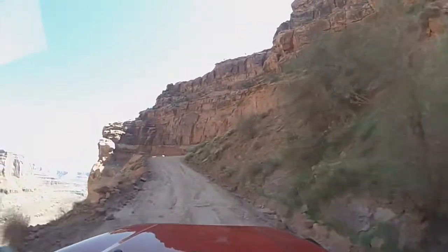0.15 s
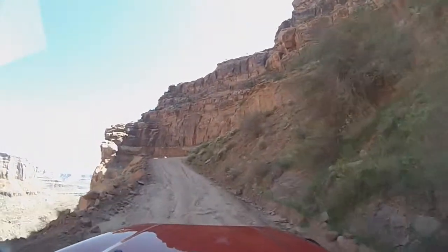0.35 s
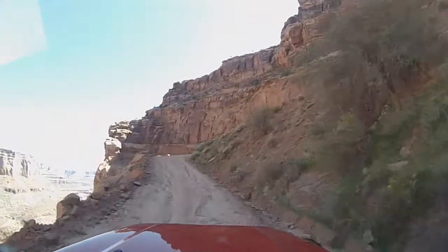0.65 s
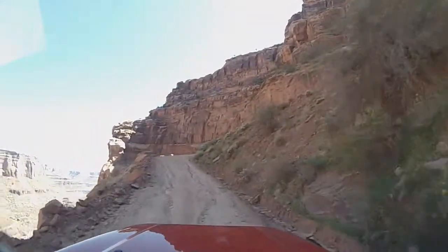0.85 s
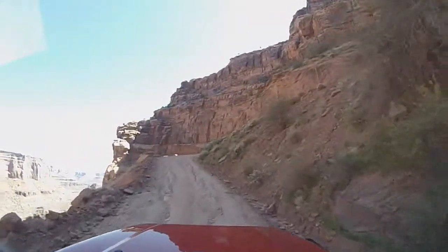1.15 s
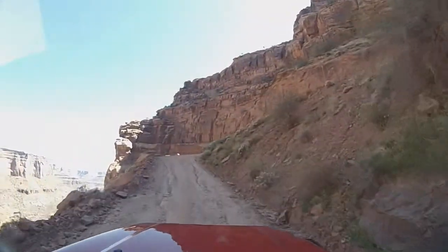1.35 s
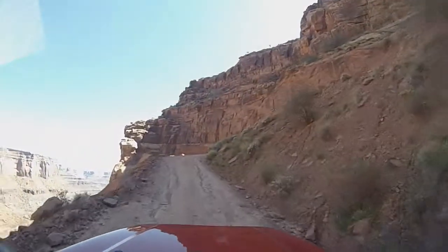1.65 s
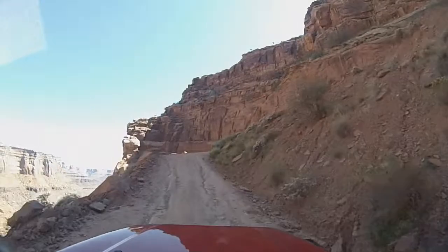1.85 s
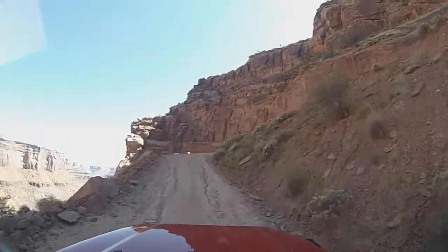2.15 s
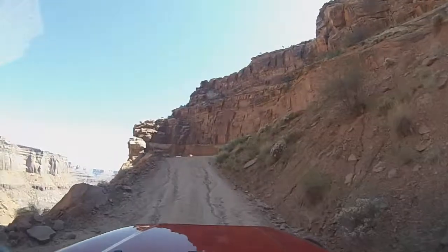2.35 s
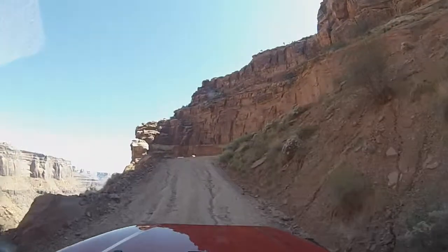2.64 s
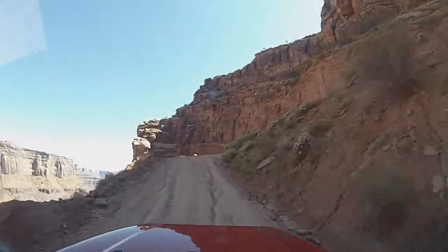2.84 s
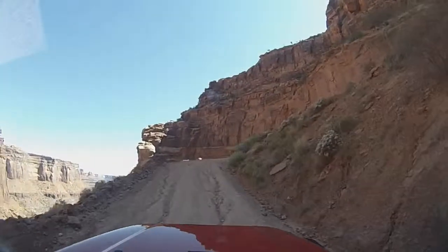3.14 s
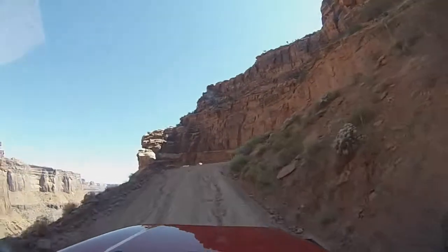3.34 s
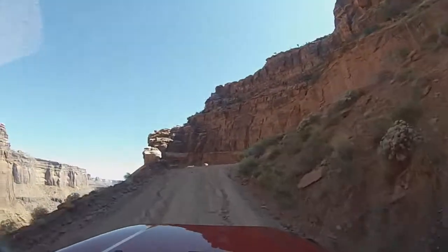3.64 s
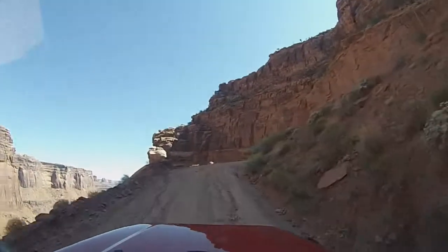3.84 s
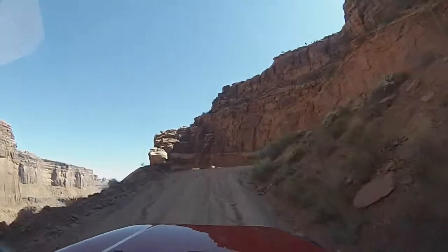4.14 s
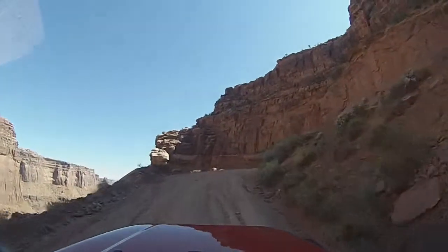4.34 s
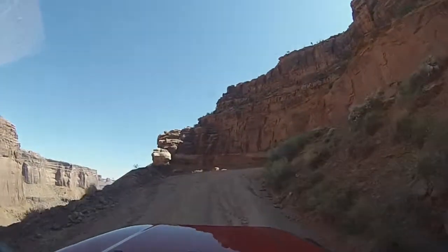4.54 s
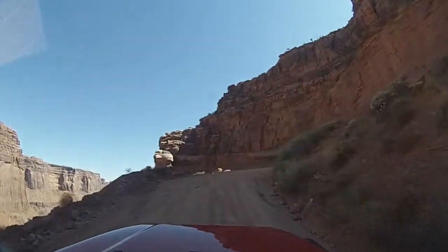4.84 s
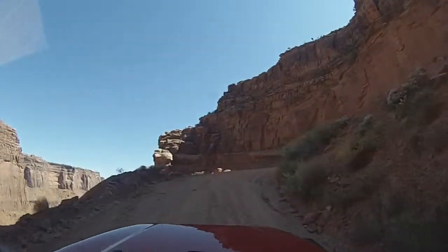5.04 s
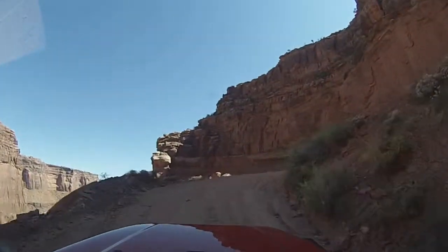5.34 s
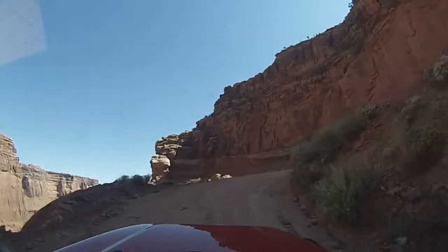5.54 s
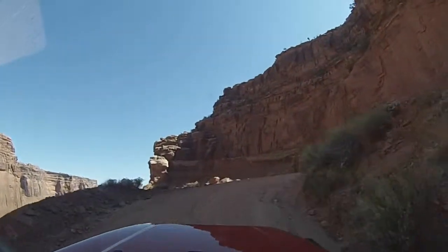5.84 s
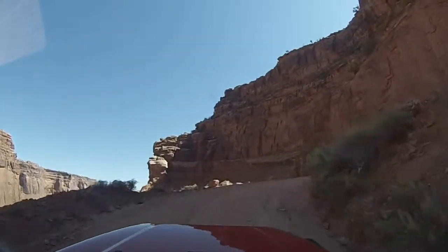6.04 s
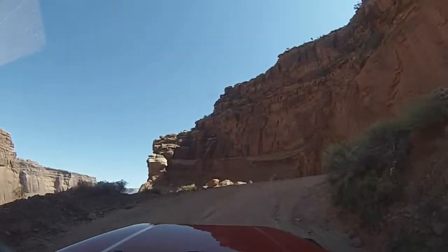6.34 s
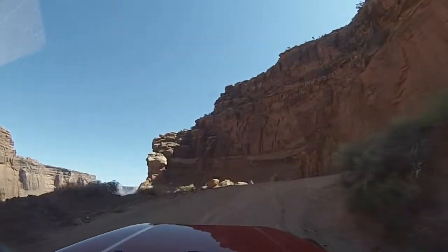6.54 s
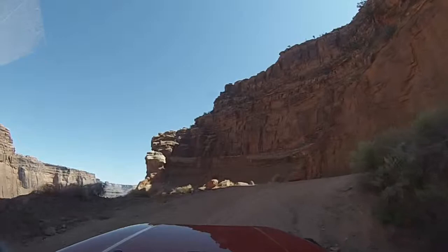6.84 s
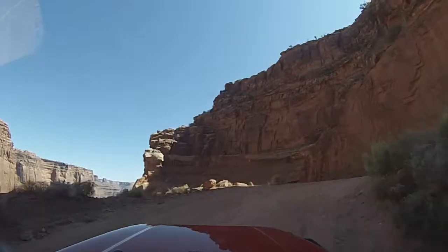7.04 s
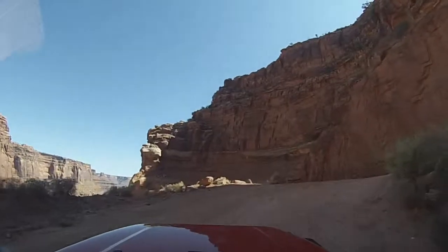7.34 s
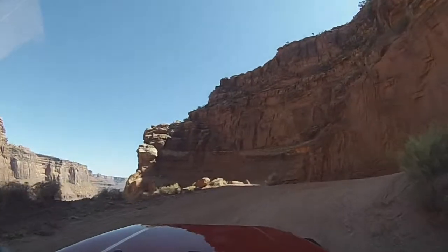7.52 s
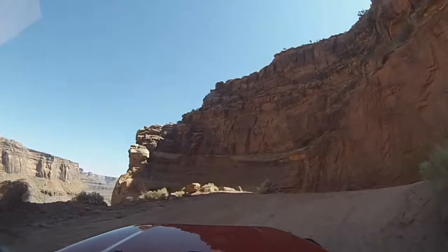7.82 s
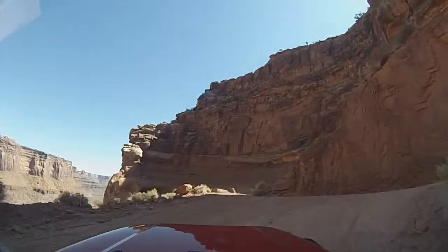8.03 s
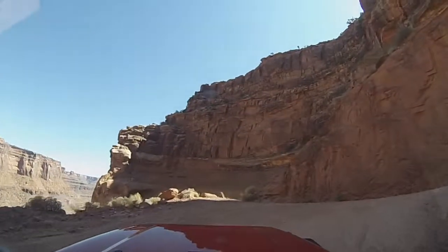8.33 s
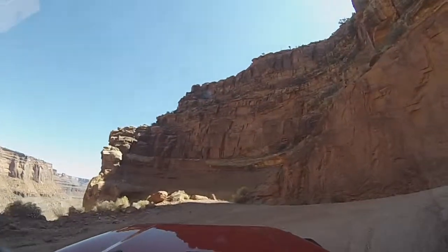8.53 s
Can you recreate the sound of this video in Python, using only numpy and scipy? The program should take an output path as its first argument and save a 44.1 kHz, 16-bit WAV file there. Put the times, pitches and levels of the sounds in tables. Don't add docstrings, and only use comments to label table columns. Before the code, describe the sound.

Inside a closed car cabin, deep shuddering boom and crunching gravel as a vehicle climbs a rough dirt track, rocks knocking underneath.

```python
import sys
import numpy as np
from scipy import signal
from scipy.fft import rfft, irfft, next_fast_len
from scipy.io import wavfile
from scipy.ndimage import uniform_filter1d

SR = 44100
rng = np.random.default_rng(int(sys.argv[2]) if len(sys.argv) > 2 else 0)


def wrap_up_sound(samples):
    columns = np.atleast_2d(samples).T
    tamed = np.clip(columns, -1, 1)
    steps = np.round(tamed * 32767).astype(np.int16)
    wavfile.write(sys.argv[1], SR, steps)


def ratio_of_db(decibels):
    return 10 ** (np.asarray(decibels, float) / 20)


N = 382788
TIME = np.arange(N) / SR
SIZE = next_fast_len(N + SR)
HZ = np.arange(SIZE // 2 + 1) * SR / SIZE + 1e-3

# start_s, firing_hz, level_db
ENGINE_SPEED = [(0, 74, -18), (.4, 79.5, -48), (.7, 88.1, -31.5), (1.7, 89.1, -30), (2.4, 92.8, -25),
                (2.8, 90.35, -27.5), (3.15, 94, -27.5), (4, 92.4, -25.5), (4.9, 94.3, -32),
                (5.4, 85.9, -32), (6.1, 75.9, -30), (6.9, 65.04, -30), (7.1, 68.8, -23),
                (7.45, 75.3, -20.5), (7.72, 82.8, -42), (8, 74, -22), (8.2, 67.62, -27),
                (8.68, 67.9, -20.5)]
# multiple_of_firing_rate, level_db
ENGINE_ORDERS = [
    (.5, -1),
    (1, 1),
    (2, -14),
    (3, -29),
]
# pitch_hz, half_width_hz, level_db
FAN_WHISTLES = [
    (2310, 37, -55.5),
    (2370, 25, -55.5),
]
# start_s, length_s, start_hz, end_hz, level_db
TRIM_SQUEAKS = [(.998, .038, 5780, 5780, -49.5), (1.005, .025, 5400, 5350, -52),
                (1.135, .04, 5700, 5300, -53), (1.175, .025, 5650, 5700, -53),
                (3.384, .024, 5700, 5750, -51), (3.388, .016, 5450, 5300, -53),
                (4.445, .02, 15000, 15000, -60), (5.085, .03, 15100, 15100, -60),
                (6.25, .032, 1180, 1100, -34), (6.28, .025, 1130, 1150, -37), (5.08, .06, 690, 700, -34),
                (7.5, .4, 245, 236, -31), (4.455, .015, 15200, 15200, -64), (2.299, .014, 3200, 3180, -38),
                (2.3, .01, 3800, 3700, -43), (8.222, .025, 1500, 1480, -33), (4.551, .01, 6300, 6000, -48),
                (4.551, .012, 4700, 4500, -44), (4.688, .016, 14500, 14400, -63)]
# start_s, level_db, tilt_db_per_octave above 5 kHz
PEBBLE_HITS = [
    (7.004, -41, 0),
    (7.018, -51, -3),
    (7.054, -53, -5),
]
# pitch_hz, level_db, t60_s
SHIELD_MODES = [(4050, 2, .03), (4380, 5, 0.04), (4750, 4, .04), (5150, 4, .03), (5300, 0, .08),
                (5480, 2, .03), (6300, -4, .025), (9300, -8, .025), (7680, -4, 0.06), (8260, -7, .03),
                (10400, -22, .6), (10800, -10, .08), (10950, -5, .025), (11500, -11, .03),
                (14900, -15, .12), (14600, -8, .025)]
# start_s, peak_db, low_part_db, middle_part_db
STONE_TICKS = [(0.12, -51.5, 12, -1), (0.3727, -48.5, 11, -2), (0.4813, -43, 3, -17), (0.616, -47, 4, -3),
               (0.746, -51, 16, -3), (0.7886, -53, 3, 0), (1.5933, -48.5, -6, 2.5), (1.7649, -58.5, 7, -1),
               (2.2423, -54, 1, -10), (2.3015, -45.5, 16, 3), (2.9537, -44.5, 13, -9),
               (3.032, -46.5, 13, -8), (3.3618, -51, 9, -1), (4.0881, -54, 4, -1), (4.1235, -49, 3, -1),
               (4.4498, -45, 3, -8), (4.5027, -46, 6.5, -1.5), (4.552, -63, 28, -4), (4.5744, -54, 0, 3),
               (4.6922, -48, -1, -2.5), (4.8239, -55, 6, -11), (4.8978, -47, 3, -5), (4.971, -47, 6, -6),
               (5.15, -47, 12, -4), (5.5804, -53, 15, -4), (6.1729, -46.5, 3, -2.5), (6.3689, -58, 5, -3),
               (7.4735, -47.5, 8, 1.5), (8.1389, -45.5, -1, -3), (8.2194, -62, 11, 3), (.8679, -57, 8, -3),
               (1.6367, -54, 5, -7), (1.8028, -57, 7, -1), (2.0253, -54, 6, -5), (2.384, -55, 6, -5),
               (2.7821, -57, 6, -4), (2.8554, -56, 7, -3), (2.8764, -53, 3, -5), (3.0974, -57, 9, -5),
               (4.1639, -54, 6, -6), (4.2313, -55, 7, -6), (6.0347, -58, 5, -3), (6.5994, -62, 10, -5),
               (6.8723, -56, 2, -11), (7.5118, -55, 2, -9), (.255, -57, 8, -2), (.912, -58, 12, 0),
               (4.463, -58, 4, -6), (4.681, -57, 2, -3), (5.74, -53, 8, -2)]
# start_s, peak_db, ring_hz, edge_db over the peak, t60_s
ROCK_KNOCKS = [(0.257, -23, 538, -16, 0.089), (0.636, -18, 448, -4, 0.1), (0.842, -16.5, 461, -15, 0.073),
               (1.569, -19, 472, 0, 0.086), (2.354, -21, 756, -16, 0.092), (2.973, -16, 422, -4.5, 0.15),
               (3.037, -19, 411, -5, 0.11), (3.489, -14, 430, -21, 0.085), (3.819, -23, 433, 1, 0.1),
               (4.553, -18, 400, -5, 0.16), (5.099, -18, 489, -18, 0.069), (5.744, -16, 506, -18, 0.13),
               (5.799, -26, 426, -21, 0.1), (6.25, -22, 500, -10, 0.13), (6.321, -18, 544, -19, 0.092),
               (8.086, -20.5, 439.5, -23, 0.091), (8.15, -23, 1050, -10, 0.16), (.136, -22, 439, -15, .08),
               (.756, -20, 377, -8, .12), (.886, -22, 398, -15, .1), (.925, -21, 549, -15, .1),
               (1.286, -22, 427, -15, .08), (1.318, -19, 416, -15, .09), (1.378, -22, 366, -15, .07),
               (1.895, -22, 371, -15, 0.089), (2.204, -20, 396, -15, .1), (2.41, -19, 380, -15, .1),
               (2.501, -21, 462, -15, .1), (2.66, -19, 448.4, -15, .08), (2.88, -21, 361, -15, .1),
               (3.101, -21, 374, -18, .12), (3.434, -23, 468, -15, .1), (4.234, -22, 376.5, -15, .1),
               (4.788, -25, 438, -15, 0.078), (5.228, -21, 326, -15, .12), (6.016, -24, 425, -15, .1),
               (7.664, -21, 450, -15, .07), (7.724, -26, 382, -15, .1), (4.595, -23, 1200, -6, 0.12)]
# start_s, peak_db, ring_hz, edge_db over the peak, t60_s
HARD_BLOWS = [
    (.546, -20, 520, -14, .05),
    (4.146, -15.5, 790, -15, .06),
    (5.717, -14, 700, -10, .08),
    (7.136, -17, 600, -6, .07),
    (8.226, -16.5, 820, -11, .16),
    (8.609, -25, 870, -8, .05),
    (7.641, -19.5, 450, -14, .08),
]
# start_s, length_s, low_hz, high_hz, level_db
GRIT_SCRAPE = (8.2, .055, 5200, 6700, -57)
# start_s, roughness_db, loose_gravel_db
TRACK_SURFACE = [(0, -2, -3), (.3, 1, -2), (.94, 3.5, .5), (1.45, 0, -2.5), (2.1, 1.5, 1.5),
                 (2.6, -0.5, .5), (3., 1, -0.5), (3.35, -2, -0.5), (3.57, 0.5, 2.5), (3.93, -1.5, 0),
                 (4.7, 0, -1), (5.3, 1.5, 0.5), (5.67, -1, -1), (6.1, 0.5, -2.5), (6.7, -7.5, -4),
                 (7.15, -7.5, -3.5), (7.55, -3, -2.5), (8.66, -7, -5.5)]
# centre_s, boom_change_db, length_s
CABIN_BUMPS = [(.14, 5.5, 0.066), (.23, 4, 0.044), (.36, 2.5, 0.044), (1.09, 3, 0.042), (1.21, 4.5, 0.055),
               (1.57, 2.5, 0.064), (1.87, 5, .1), (2.45, 3, 0.16), (2.74, 7, 0.091), (2.9, 5.5, 0.047),
               (3.07, 8.5, 0.041), (3.15, 7, 0.038), (3.5, 7.5, 0.044), (3.65, 3, 0.12), (3.94, 4, 0.049),
               (4.06, 10, 0.051), (4.2, 8, .05), (4.28, 5, 0.042), (4.68, 5, 0.12), (4.91, 4.5, 0.041),
               (5.27, 4.5, 0.043), (5.44, 2, 0.089), (5.68, 9, 0.057), (5.86, 5, .1), (6.12, 4.5, 0.046),
               (6.47, 7, 0.099), (6.62, 4.5, .07), (.95, 2.5, .06), (5.4, 0.5, .04), (8.66, 6, .04),
               (7.46, 6, 0.096), (7.68, 3.5, 0.081), (8.24, 9.5, 0.068), (8.5, 6.5, .1)]
# centre_s, boom_change_db, length_s
SPRING_FLOATS = [(0, -7, 0.08), (.19, -16, 0.035), (1.14, -8, 0.033), (1.45, -7, 0.08), (1.93, -19, 0.038),
                 (2.56, -8, 0.081), (2.85, -2, .03), (2.97, -9, 0.05), (3.43, -5.5, 0.11),
                 (3.75, -4.5, .03), (3.88, -15, 0.045), (4.01, -2.5, 0.046), (4.13, -7, .04),
                 (4.95, -23, .025), (5.11, -10, 0.051), (5.58, -6, 0.075), (5.76, -6.5, 0.09),
                 (6.07, -12.5, 0.052), (6.28, -2, .04), (6.74, -25, .04), (7.16, -9, 0.041),
                 (7.76, -7, 0.051), (8.12, -1, .06), (8.3, -5, 0.059), (8.56, -13, 0.051)]
# centre_s, drone_change_db,
# crunch_change_db, length_s
WHEEL_JOLTS = [(.25, 4.5, 1, 0.12), (.97, -2, 2.5, .03), (1.11, -4, -0.5, 0.039), (2.12, 3.5, -1.5, .04),
               (2.27, 1.5, 2.5, 0.099), (2.59, -7, -0.5, 0.057), (2.73, 2, 0, 0.055), (2.85, 2, -0.3, .05),
               (2.92, -3, 4, .03), (2.97, 7.5, 4.5, 0.051), (3.06, 7.5, -0.5, 0.063), (3.42, 6, 3, 0.088),
               (3.53, -6, 1.5, 0.053), (3.77, -3.5, -1.2, 0.11), (3.94, 2, 2.5, 0.035),
               (4.2, 2.5, 6, 0.064), (4.45, -3, 2.5, 0.053), (5.18, 5, -0.5, 0.098), (5.41, 4, 1, 0.043),
               (5.51, -1, -2, 0.051), (5.67, 6, 1.5, 0.047), (5.76, 2, 5, 0.13), (5.87, 6.5, -1, 0.041),
               (6.36, -7, 0, .04), (6.42, 0, 0.5, 0.044), (6.69, 7, -1, .04), (6.78, 5, 0.5, .05),
               (7.23, 1.5, -1.3, 0.13), (7.47, 7, 1, .1), (8.1, 8, 0, 0.044), (.413, 1, -6, 0.017),
               (.62, .1, -2.5, .06), (1.3, -0.5, -1, .08), (1.52, 1, 1.5, .06), (1.72, -6, -1, .05),
               (2.0, 3, 1.5, .05), (4.05, 4, 1.5, 0.055), (4.7, -3, 0.8, .1), (4.95, 2.5, 0, .06),
               (6.2, 2, 1.5, .06), (6.52, -3, -1, .08), (7.0, 0.5, -0.8, .08), (7.35, -2, -1, 0.067),
               (7.43, -0.5, 3, .03), (7.56, 1, 1, .06), (7.785, .1, -3, .02), (7.9, 1.5, -0.8, .08),
               (8.17, -4, 1, .05), (8.42, 4, -0.3, .08), (8.6, -2, 1.5, .06)]
# centre_s, level_change_db, length_s
LOW_HUM_SWELLS = [(.1, 0, 0.09), (.55, 1, .1), (1.0, -3, .08), (1.22, -4, 0.063), (1.37, 6.5, .1),
                  (1.7, 1.5, .1), (2.0, 2, .06), (2.15, 4, .06), (2.47, -5, 0.092), (2.85, 4, .1),
                  (3.1, -1, .1), (3.6, 0, .12), (3.93, -3, .06), (4.17, 7.5, .12), (4.5, -1.5, 0.098),
                  (4.85, 1.5, .08), (5.1, -3, .1), (5.3, -6, .08), (5.7, 0, .08), (5.95, -2.5, 0.082),
                  (6.3, -2, .1), (6.62, 4, 0.083), (6.78, -4, 0.059), (7.0, -4, .08), (7.4, 1.5, .1),
                  (7.8, -2, .1), (8.1, 4, .1), (8.4, 1.5, .1)]
# pitch_hz, level_db_per_hz
LOW_COLOUR = [(7.1, -33.5), (12, -3), (32, 0), (48, -1), (107, -14), (134, -15.5), (202, -20), (238, -19.5),
              (299, -23), (423, -23), (599, -32), (766, -29.5), (1600, -42.5), (2080, -72.5), (3520, -120)]
# pitch_hz, level_db_per_hz
TREBLE_COLOUR = [(710, -32), (1200, 2.5), (1630, -4), (2350, -7.5), (2500, -10), (3710, -13), (4080, -17),
                 (11100, -33.5), (14500, -40), (15300, -52)]
# pitch_hz, width_hz, gain_db
CABIN_RESONANCES = [(33.9, 4.3, 3), (43.8, 9.8, 4), (67.2, 11.4, 3.5), (129, 25.6, 7), (173.3, 32, 3),
                    (240.2, 16.6, 7), (414, 180, 0), (514, 50, 1.5), (790, 150, -0.5), (1130, 56, 4),
                    (2666, 150, 2.5), (3530, 300, -1), (14700, 1200, 6)]


def curves(table):
    s, *columns = np.transpose(table)
    return [np.interp(TIME, s, column) for column in columns]


def swells(rows):
    out = np.zeros((len(rows[0]) - 2, N))
    for s, *change_db, length in rows:
        near = slice(max(int((s - .5) * SR), 0), int((s + .5) * SR))
        width = np.clip(length / 2 ** .5, .008, .2)
        out[:, near] += np.outer(change_db, np.exp(-((TIME[near] - s) / width) ** 2))
    return out


def unit(x):
    return x / np.sqrt(np.mean(x ** 2))


def causal(x, gain):
    cepstrum = irfft(np.log(gain + 1e-9), SIZE)
    cepstrum[1:SIZE // 2] *= 2
    cepstrum[SIZE // 2 + 1:] = 0
    return irfft(rfft(x, SIZE) * np.exp(rfft(cepstrum)), SIZE)[:N]


def band(lo_hz, hi_hz, order=4):
    return ((1 + (lo_hz / HZ) ** (2 * order)) * (1 + (HZ / hi_hz) ** (2 * order))) ** -.5


def cabin(spectrum):
    hz, db = np.transpose(spectrum)
    peaks_db = sum(gain_db / (1 + (2 * (HZ - f) / width) ** 2) for f, width, gain_db in CABIN_RESONANCES)
    return ratio_of_db(np.interp(np.log(HZ), np.log(hz), db) + peaks_db)


def walk(rate_hz):
    hold = int(SR / rate_hz)
    steps = np.repeat(rng.standard_normal(N // hold + 1), hold)
    return unit(uniform_filter1d(uniform_filter1d(steps, hold), hold)[:N])


def grains(rate_hz, spread_db):
    chance = rng.random((3, N))
    cracks = chance[0] < rate_hz / SR
    sign = np.sign(chance[1] - .5)
    return unit(cracks * sign * ratio_of_db(-spread_db * np.log(1 - chance[2])))


def burst(s, t60, wave, rise=0.0003):
    i = int(s * SR)
    t = np.arange(min(len(wave), N - i)) / SR
    return slice(i, i + len(t)), wave[:len(t)] * np.minimum(t / rise, 1) * ratio_of_db(-60 * t / max(t60, .005))


def damped(x, share, span_s):
    swing = uniform_filter1d(np.abs(signal.hilbert(x, SIZE)[:N]), int(span_s * SR))
    return unit(x / swing ** share)


def fan():
    air = rng.standard_normal(N)
    return sum(ratio_of_db(db) * unit(causal(air, band(hz - width, hz + width, order=40)))
               for hz, width, db in FAN_WHISTLES)


def engine():
    hz, db = curves(ENGINE_SPEED)
    phase = 2 * np.pi * np.cumsum(hz * (1 + 0.00375 * walk(12))) / SR
    orders = sum(ratio_of_db(order_db + 1.3 * walk(9)) * np.sin(k * phase + k * k) for k, order_db in ENGINE_ORDERS)
    return np.sqrt(2) * ratio_of_db(db) * orders


def squeaks():
    out = np.zeros(N)
    unsteady, stutter = 1 + .009 * walk(500), ratio_of_db(2.5 * walk(300))
    for s, length, start_hz, end_hz, db in TRIM_SQUEAKS:
        along = np.clip((TIME - s) / length, 0, 1)
        hz = (start_hz + (end_hz - start_hz) * along) * unsteady
        swing = np.sin(2 * np.pi * np.cumsum(hz) / SR)
        out += ratio_of_db(db) * np.sin(np.pi * along) * stutter * swing
    return out


def pebble():
    out, t = np.zeros(N), np.arange(SR // 2) / SR
    for s, db, tilt_db in PEBBLE_HITS:
        for hz, mode_db, t60 in SHIELD_MODES:
            where, wave = burst(s, t60, np.sin(2 * np.pi * hz * t))
            out[where] += ratio_of_db(db + mode_db + tilt_db * max(np.log2(hz / 5000), 0)) * wave
        where, click = burst(s, 0.03, rng.standard_normal(4000))
        out[where] += ratio_of_db(db + 3 + tilt_db) * click
    chatter = ratio_of_db(2.5 * walk(300))
    return causal(out * chatter, band(3600, 11200, order=5) + .16 * band(11200, 15600, order=8))


def ticks():
    parts, chance = np.zeros((3, N)), rng.standard_normal((len(STONE_TICKS), 3, 4000))
    for (s, db, low_db, mid_db), noise in zip(STONE_TICKS, chance):
        for part, wave, share_db in zip(parts, noise, (low_db, mid_db, 0)):
            where, crack = burst(s, 0.035, wave, rise=0.0017)
            part[where] += ratio_of_db(db + share_db) * crack
    low = causal(parts[0], band(3100, 5360, order=5))
    middle = causal(parts[1], band(5500, 8200, order=5))
    high = causal(parts[2], band(8500, 11000, order=5) + .45 * band(13800, 15500, order=12))
    return ratio_of_db(5.5) * low + ratio_of_db(11.5) * middle + ratio_of_db(-3.0) * high


def knocks():
    rows = [(2.5, *row) for row in ROCK_KNOCKS] + [(19, *row) for row in HARD_BLOWS]
    thud, edge, ring = np.zeros((3, N))
    chance = rng.standard_normal((len(rows), 3, 8000))
    for (contact, s, db, hz, edge_db, t60), noise in zip(rows, chance):
        where, wave = burst(s, 1.23 * t60, noise[0])
        thud[where] += ratio_of_db(db) * wave
        thud[where.start] -= contact * ratio_of_db(db)
        where, wave = burst(s, .5 * t60, noise[2])
        edge[where] += ratio_of_db(db + edge_db) * wave
        edge[where.start] -= .5 * contact * ratio_of_db(db + edge_db)
        wobble = 1 + 1.13 * uniform_filter1d(noise[1], size=120)
        where, wave = burst(s, t60, np.sin(2 * np.pi * hz * np.cumsum(wobble) / SR))
        ring[where] += ratio_of_db(db - 8.0) * wave
    floor = band(20, 2600, order=6)
    return (causal(1.24 * thud, floor * band(290, 1140, order=3))
            + causal(1.33 * edge, floor * band(1200, 2500, order=4))
            + causal(ring, floor))


def scrape():
    s, length, lo_hz, hi_hz, db = GRIT_SCRAPE
    swell = np.sin(np.pi * np.clip((TIME - s) / length, 0, 1))
    return ratio_of_db(db) * swell * unit(causal(grains(3000, 2.1), band(lo_hz, hi_hz, order=8)))


def road():
    colour, treble = cabin(LOW_COLOUR), cabin(TREBLE_COLOUR)
    rough_db, loose_db = curves(TRACK_SURFACE)
    bump_db, = swells(CABIN_BUMPS + SPRING_FLOATS)
    load_db, squeeze_db = swells(WHEEL_JOLTS)
    sway_db, = swells(LOW_HUM_SWELLS)
    jolt = walk(28)
    stones = grains(2200, 2.04)
    hiss = rng.standard_normal((4, N))

    boom = damped(causal(hiss[0], colour * band(9.9, 62.4)), 0.77, 0.035)
    sway = ratio_of_db(sway_db - 2.5) * unit(causal(hiss[3], colour * band(58.0, 107.5)))
    drone = damped(causal(hiss[1] + 0.42 * stones, colour * band(114.0, 287.0)), 0.47, 0.044) + sway
    crunch = damped(causal(hiss[2] + 1.08 * stones, colour * band(321, 1290, order=2)), 0.46, 0.088)
    gravel = unit(causal(grains(9000, 1.2) + 0.23 * stones, treble * band(1470, 5430, order=3)))
    grit = unit(causal(grains(11000, 2.0) + .15 * stones, treble * band(5500, 16000)))
    grit *= ratio_of_db(.4 * jolt + .6 * walk(25))

    boom_db = -15 + 0.93 * rough_db + bump_db
    drone_db = -25.5 + rough_db + load_db + 0.14 * jolt
    crunch_db = -28.5 + 0.35 * rough_db + 0.62 * loose_db + squeeze_db + 0.81 * jolt + 0.86 * walk(20)
    gravel_db = -39.5 + loose_db + 0.41 * squeeze_db + 0.32 * jolt + 0.78 * walk(25)
    grit_db = -59.5 + 1.32 * loose_db + .4 * squeeze_db
    return (ratio_of_db(boom_db) * boom + ratio_of_db(drone_db) * drone + ratio_of_db(crunch_db) * crunch
            + ratio_of_db(gravel_db) * gravel + ratio_of_db(grit_db) * grit)


def scene():
    return (fan() + engine() + squeaks() + pebble() + ticks() + knocks() + scrape() + road())[None]


def starved(x, from_hz, edge_hz, patchy_db, hole_db):
    hz, _, tiles = signal.stft(x, SR, nperseg=1024)
    power = np.abs(uniform_filter1d(np.abs(tiles) ** 2, size=10, axis=0)) + 1e-20
    mood = uniform_filter1d(rng.standard_normal(tiles.shape), size=2, axis=1)
    mood = uniform_filter1d(mood, size=14, axis=0)
    usual = np.median(power, axis=1, keepdims=True)
    over_db = 6 * np.log10(power / usual) + patchy_db * unit(mood)
    dropped = over_db < hole_db + 11 * (hz[:, None] > edge_hz)
    top = np.clip((hz[:, None] - from_hz) / 3000, 0, 1)
    return signal.istft(tiles * (1 - .97 * top * dropped), SR, nperseg=1024)[1][:N]


def roll_off(x):
    return signal.sosfilt(signal.butter(12, 15710, fs=SR, output="sos"), x)


def record(dry):
    heard = np.tanh(0.8 * dry[0]) / 0.8
    heard = starved(heard, from_hz=10800, edge_hz=15150, patchy_db=4.5, hole_db=-3.5)
    return roll_off(heard[None])


dry = scene()
out = record(dry)
wrap_up_sound(out)
```